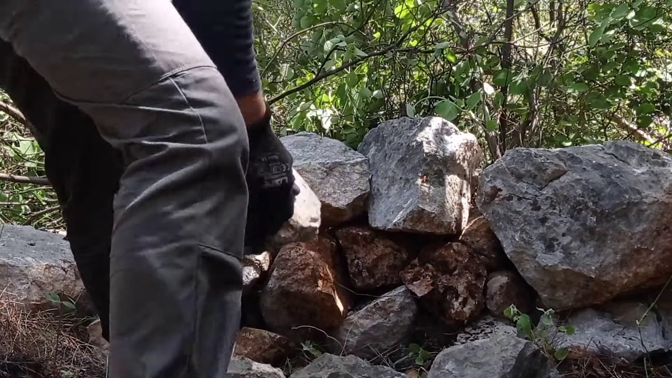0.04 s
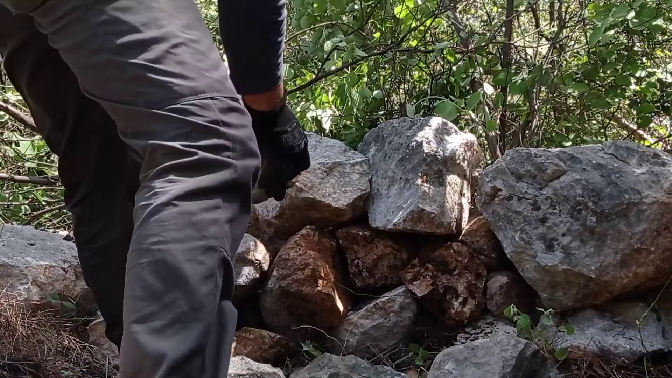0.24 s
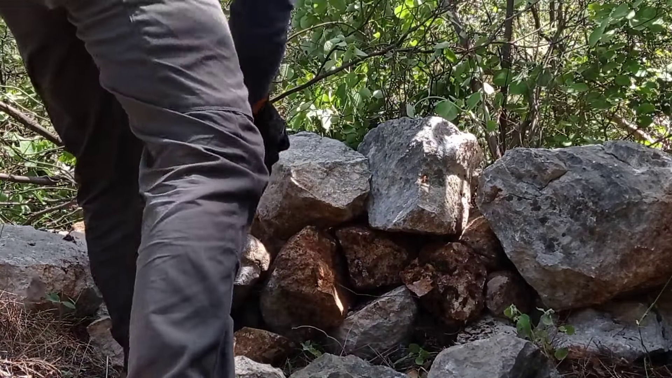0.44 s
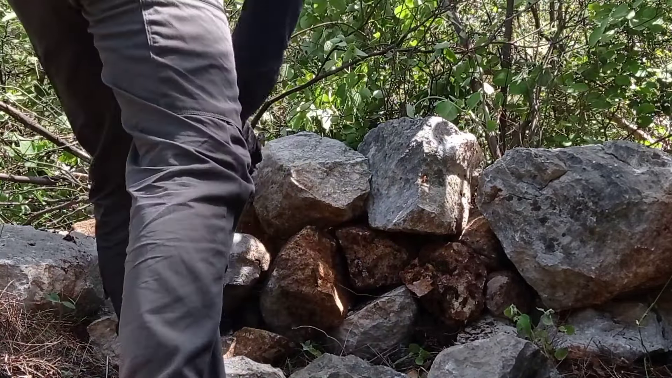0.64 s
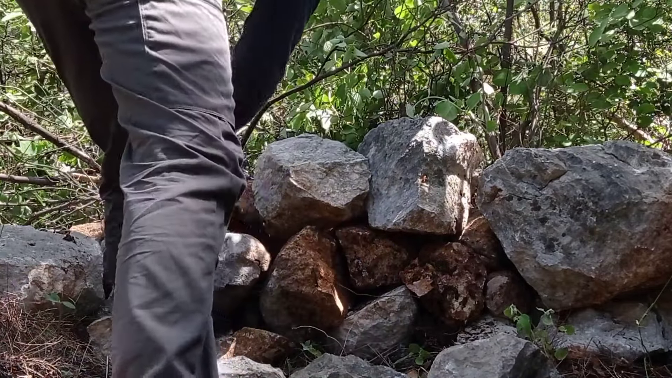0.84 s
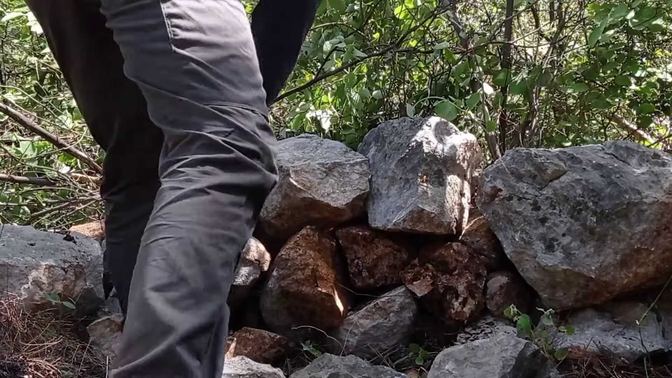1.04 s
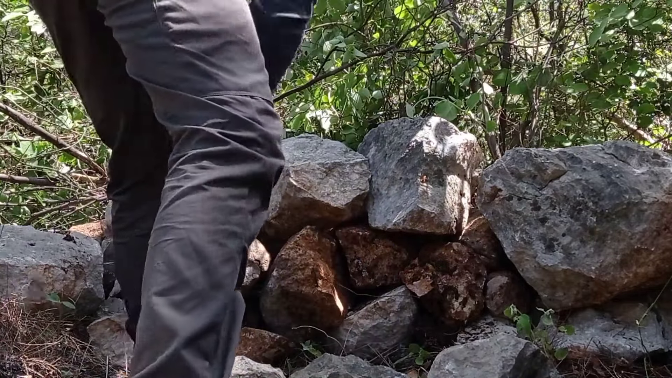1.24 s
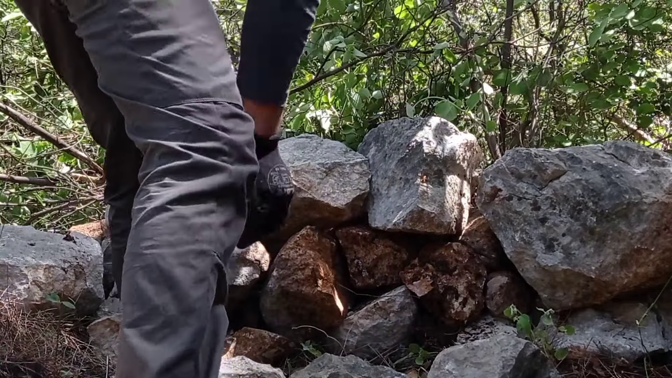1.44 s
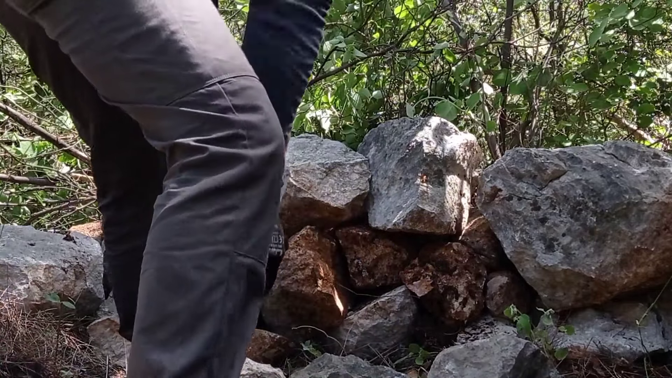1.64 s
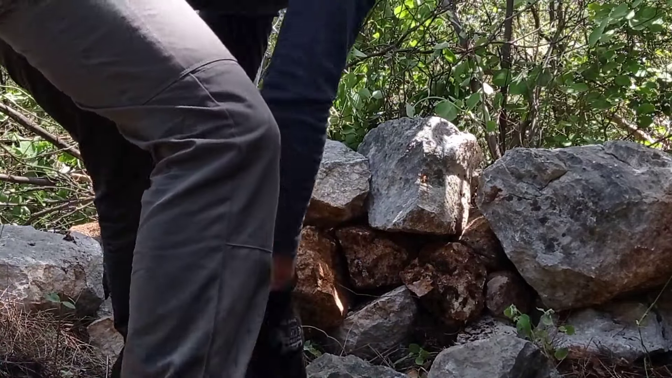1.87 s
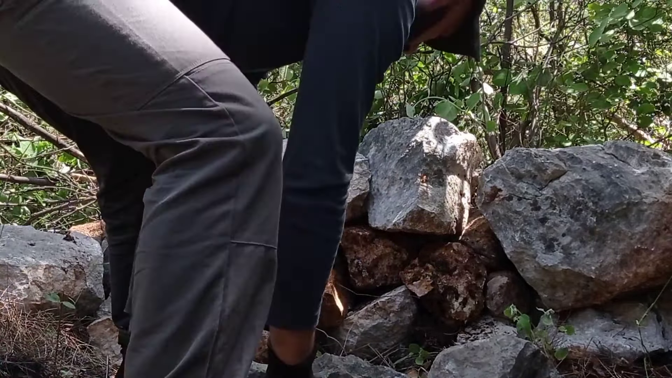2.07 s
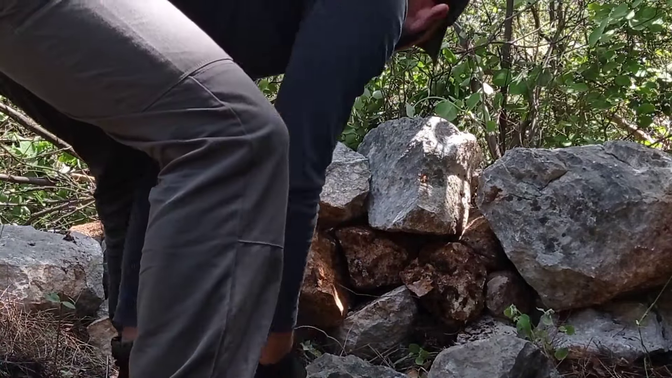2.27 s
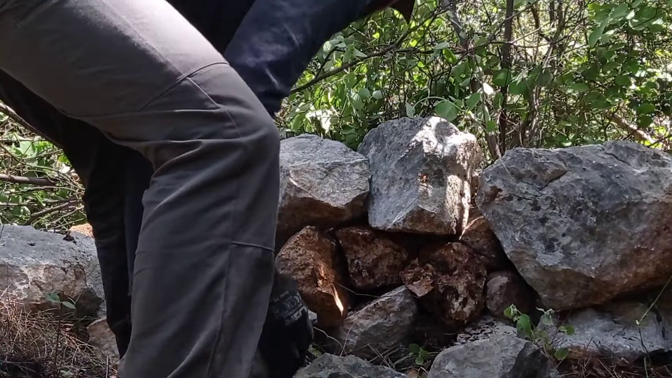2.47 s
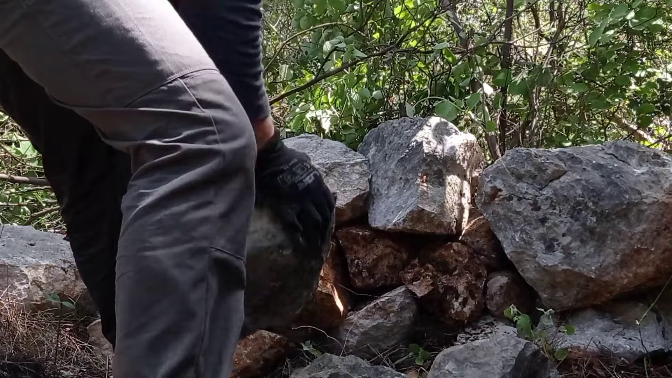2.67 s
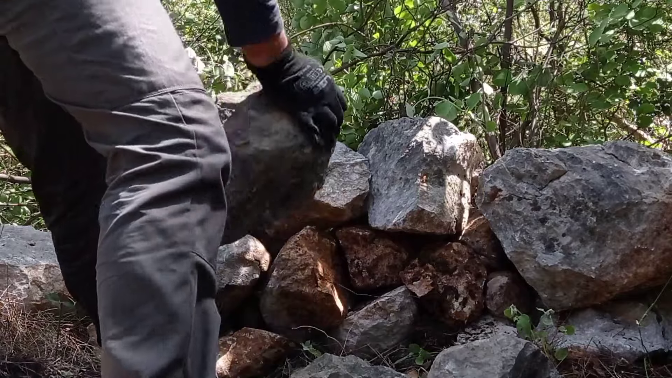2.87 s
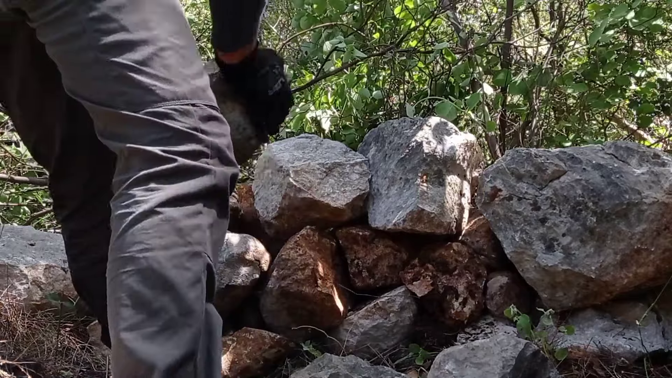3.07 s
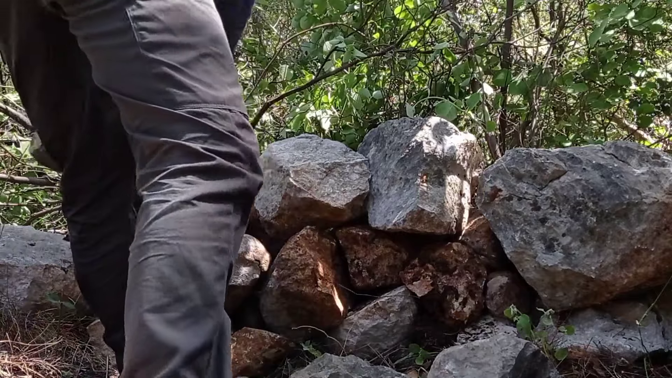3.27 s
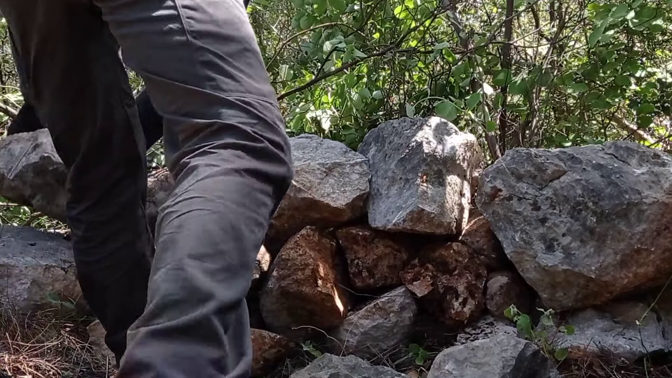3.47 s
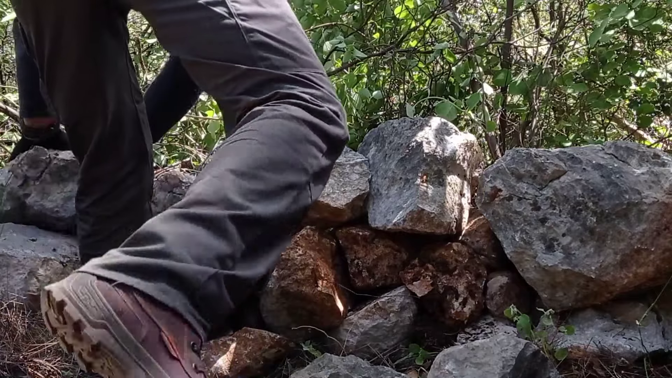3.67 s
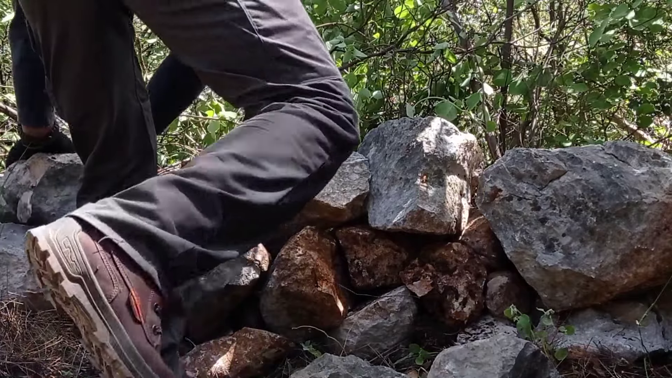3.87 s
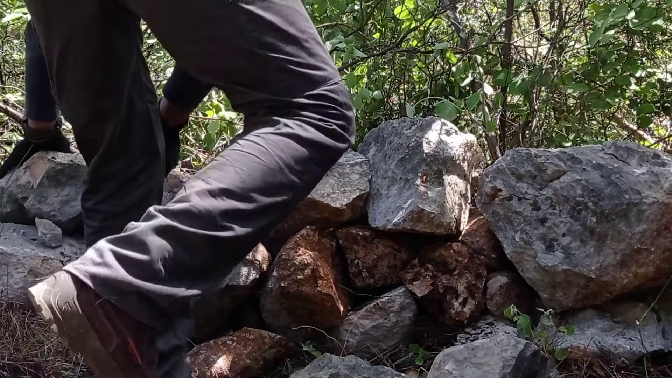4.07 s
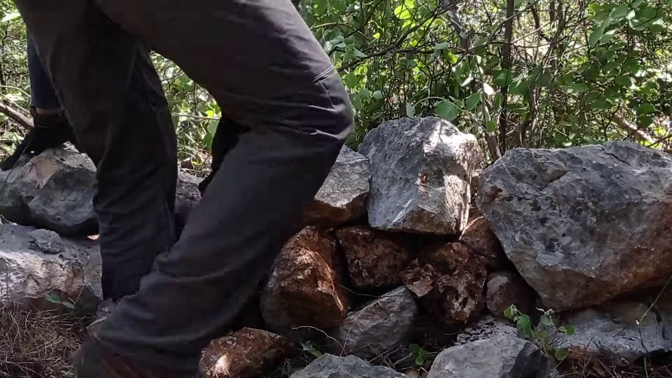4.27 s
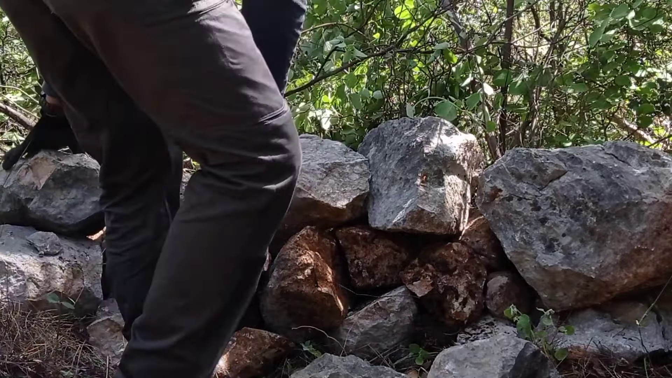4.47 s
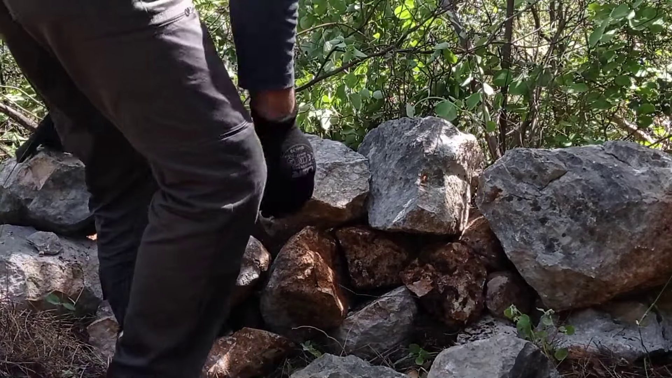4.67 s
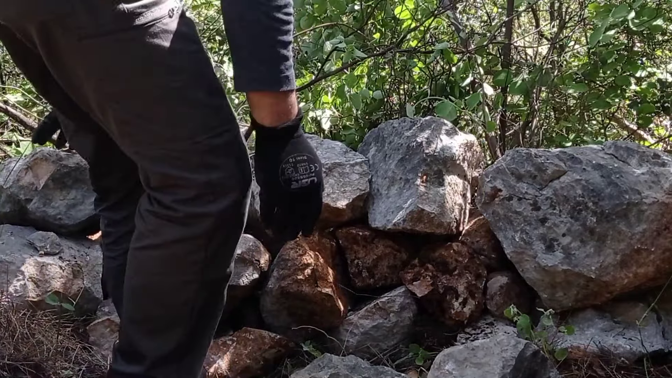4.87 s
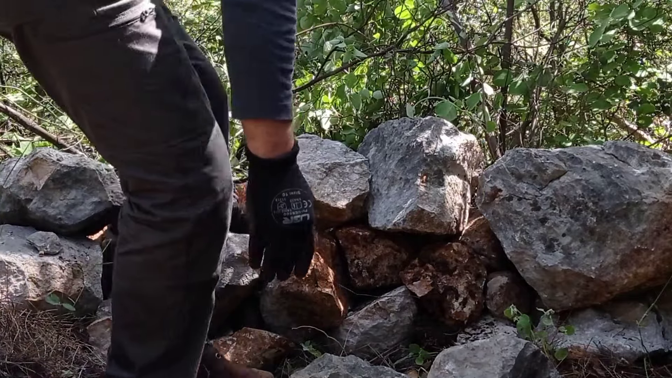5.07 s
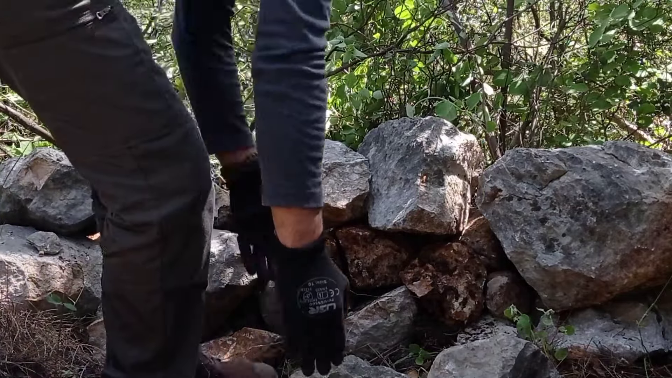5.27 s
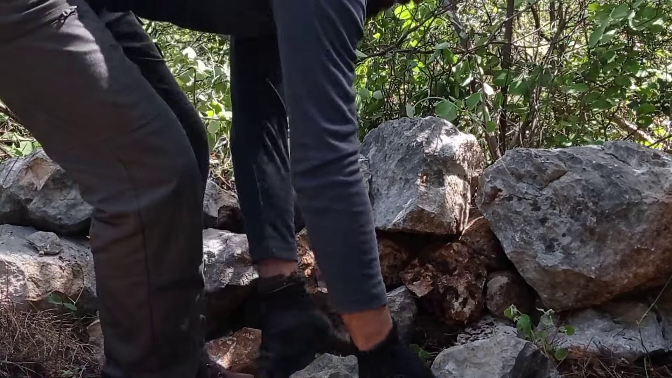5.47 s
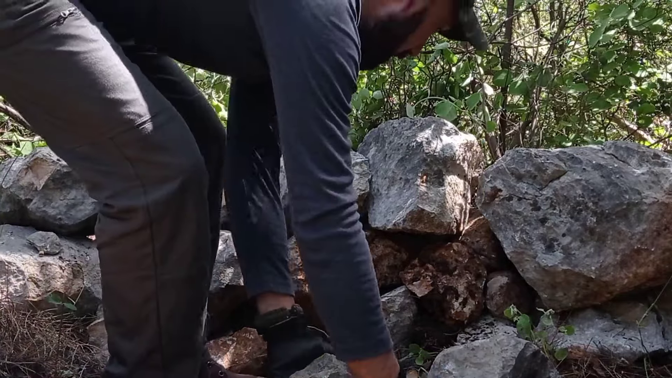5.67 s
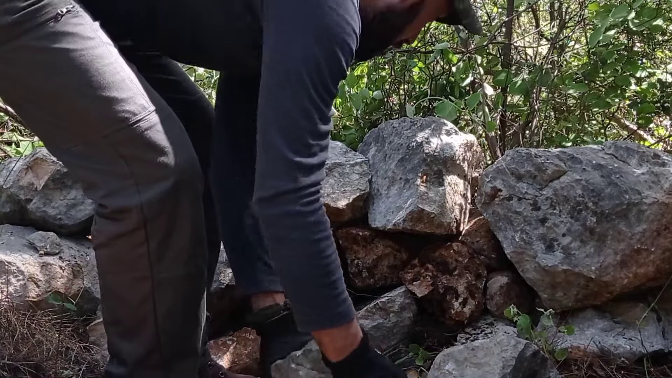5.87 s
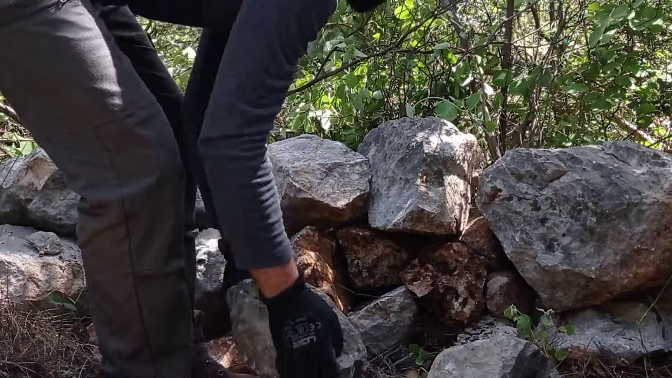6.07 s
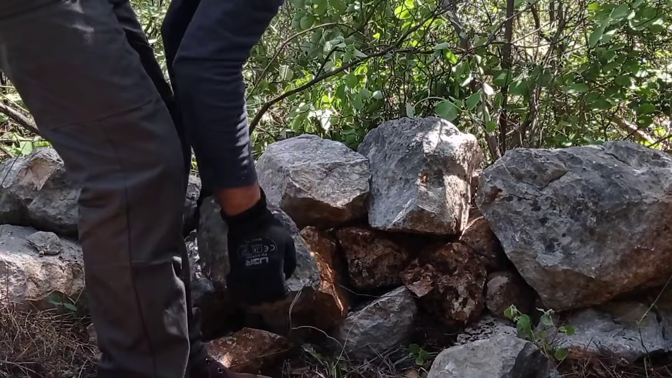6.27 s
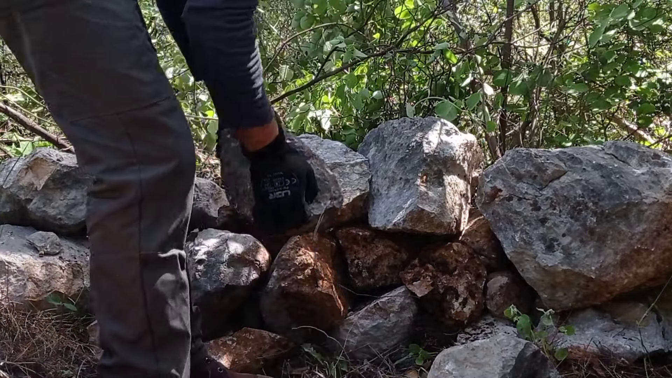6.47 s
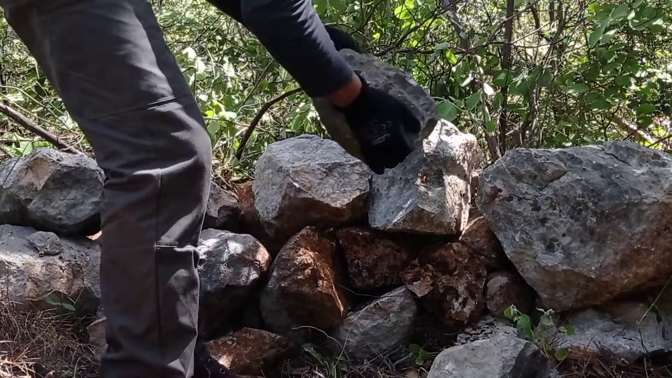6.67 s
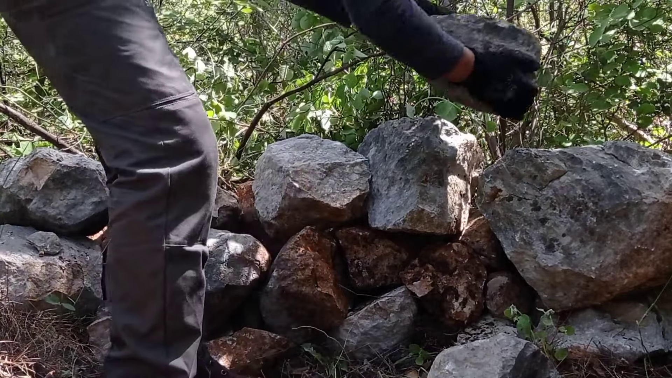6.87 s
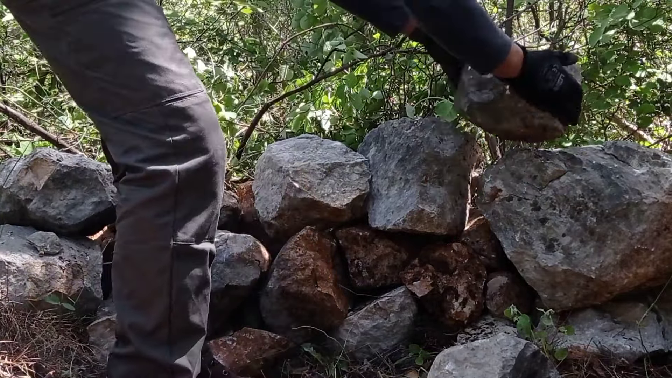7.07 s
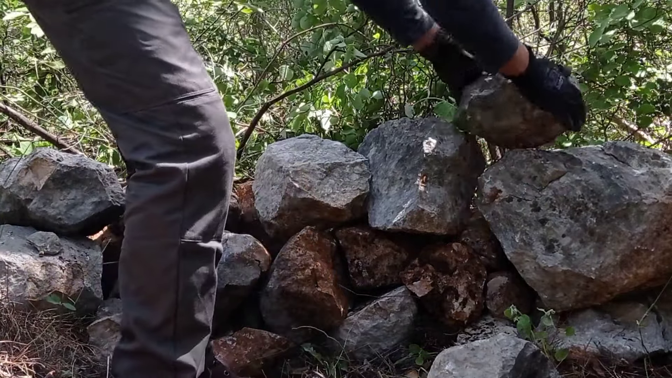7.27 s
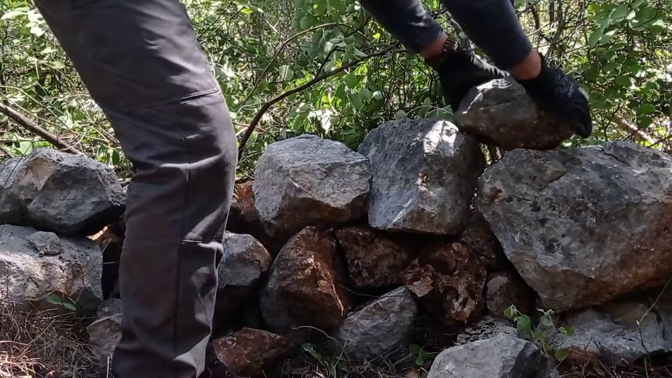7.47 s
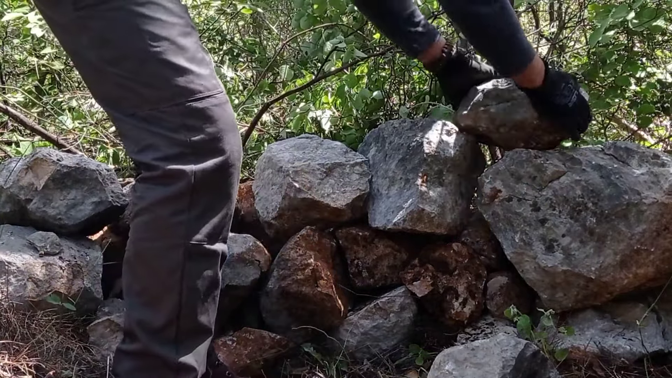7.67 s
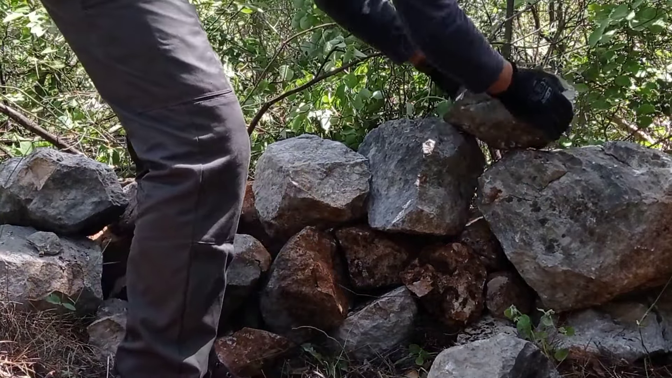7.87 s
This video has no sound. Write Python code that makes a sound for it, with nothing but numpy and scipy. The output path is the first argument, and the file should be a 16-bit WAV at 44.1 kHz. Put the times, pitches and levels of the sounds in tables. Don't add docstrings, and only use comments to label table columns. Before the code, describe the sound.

Outdoors, a microphone a step or two from someone stacking stones. Quiet low rumble, then a sharp double stone clack with small bounces. Dry leaves crunch, boot edges scuff, a distant bird chips and slurs. A second pair of blows follows with tumbling knocks and gritty ticks, then quieter rustling and a brief hollow gust. Finally a rock lands and wobbles until seated.

```python
import sys
import numpy as np
from scipy import signal
from scipy.fft import rfft, irfft, next_fast_len
from scipy.io import wavfile
from scipy.ndimage import uniform_filter1d, map_coordinates

SR = 44100
rng = np.random.default_rng(int(sys.argv[2]) if len(sys.argv) > 2 else 0)


def gain_from_db(level_db):
    decades = np.asarray(level_db, float) / 20
    return 10 ** decades


def log_audio(samples):
    frames = np.atleast_2d(samples).T
    limited = np.clip(frames, -1, 1)
    pcm = np.round(limited * 32767).astype(np.int16)
    wavfile.write(sys.argv[1], SR, pcm)


N = 349624


def unit(x):
    return x / np.sqrt(np.mean(x ** 2) + 1e-20)


def along(points, hz):
    f, value = np.transpose(points)
    return np.interp(np.log(hz + 1), np.log(f + 1), value)


def wobble(rate, size=N):
    coarse = np.arange(0, size + 16, 16)
    knots = rng.standard_normal(int(size * rate / SR) + 5)
    return np.interp(np.arange(size), coarse, map_coordinates(knots, [coarse * rate / SR]))


def swells(rows):
    t = np.arange(0, N + 64, 64) / SR
    rows = np.array(rows)
    late = t - rows[:, :1]
    width = np.where(late < 0, rows[:, 1:2], rows[:, 2:3])
    bell = np.exp(-(late / width) ** 2)
    gains = np.sqrt(gain_from_db(2 * rows[:, 3:]).T @ bell ** 2)
    return [np.interp(np.arange(N) / SR, t, gain) for gain in gains]


def coloured(x, gain_db):
    size = next_fast_len(len(x) + 4096)
    gain = gain_from_db(gain_db(np.fft.rfftfreq(size, 1 / SR)))
    return unit(irfft(rfft(x, size) * gain, size)[:len(x)])


def hump(f, hz, octaves):
    return np.maximum(-6 * (np.log2((f + 1) / hz) / octaves) ** 2, -80)


def rush(spectrum, patchy_db, grain_db):
    grains = rng.standard_normal(N) * gain_from_db(grain_db * wobble(250))
    z = signal.stft(grains, nperseg=512)[2]

    def field(bins, frames):
        noise = uniform_filter1d(rng.standard_normal(z.shape), bins, 0)
        return unit(uniform_filter1d(noise, frames, 1))

    patches = field(8, 12) + field(2, 6)
    x = signal.istft(z * gain_from_db(patchy_db * patches), nperseg=512)[1][:N]
    return coloured(x, lambda hz: along(spectrum, hz))


def add(track, s, sound):
    track[round(s * SR):][:len(sound)] += sound


def burst(gain_db, t60, rise):
    t = np.arange(SR // 8) / SR
    steps = np.repeat(rng.standard_normal(len(t) // 30 + 1), 30)[:len(t)]
    grit = rng.standard_normal(len(t)) * gain_from_db(4 * steps)
    dying = gain_from_db(-60 * t / t60) + gain_from_db(-22 - 60 * t / (3.5 * t60))
    return coloured(grit, gain_db) * dying * (1 - np.exp(-t / rise))


def ring(modes, contact_ms):
    t = np.arange(SR // 8) / SR
    x = np.zeros(len(t))
    for hz, db, t60 in modes:
        rise = (contact_ms + .05) / 1000 * min(1, (1100 / hz) ** 1.5)
        drive = ((1 - np.exp(-t / rise)) * t60 / (t60 + rise)) ** 2
        x += gain_from_db(db - 60 * t / t60) * np.sin(2 * np.pi * hz * t) * drive
    return -x / np.abs(x).max()


# frequency in Hz, level in dB per Hz.
CRACK_SPECTRUM = [(700, -27.5), (1500, 3.5), (3000, -5.5), (4500, -7.5), (6400, -10), (8500, -22.5),
                  (12500, -39), (15400, -29), (16500, -42)]


def crack(t60, rise):
    return burst(lambda hz: along(CRACK_SPECTRUM, hz), t60, rise)


# frequency in Hz, level in dB per Hz.
PILE_SPECTRUM = [(29, -35), (60, -16), (150, 0.5), (307, -2.5), (513, -5), (1070, -9.5), (1210, -7),
                 (1720, -16), (2580, -20), (4000, -25.5), (5200, -56), (8800, -120)]
# frequency in Hz, t60 in seconds.
PILE_DECAY = [(60, .4), (200, 0.16), (700, 0.33), (1500, .2), (4000, 0.13)]


def pile_shake():
    chatter = rng.standard_normal(SR // 2) * gain_from_db(5.5 * wobble(110, size=SR // 2))
    hz, t, z = signal.stft(coloured(chatter, lambda f: along(PILE_SPECTRUM, f)), SR, nperseg=512)
    dying = gain_from_db(-60 * t / along(PILE_DECAY, hz)[:, None])
    tail = signal.istft(z * dying, SR, nperseg=512)[1]
    return tail * (1 - np.exp(-np.arange(len(tail)) / SR / 0.0013))


# start in seconds, peak in dB, contact in ms, crack in dB,
# pile shake in dB.
BLOWS = [
    (0.7419, -10.2, 1.65, -11.5, -28),
    (.809, -4.7, 1.84, -29, -30),
    (3.5309, -10.2, .92, -18, -24),
    (3.5546, -10.7, 1.21, -10, -28),
    (7.1167, -11.1, 3, -16, -39),
]
# mode in Hz, level in dB, t60 in seconds.
ROCKS = [
    [(130, -40, .09), (390, -24, .05), (530, 0, .007), (880, -11, .022), (1100, -16, .016), (1440, -9, .01),
     (1820, -27, .02), (2940, -19, .016), (3950, -19, .012), (4700, -24, .01)],
    [(160, -26, .021), (420, -34, .05), (650, 0, .009), (840, 0, .009), (930, -12, .017), (1230, -13, .011),
     (1560, -16, .005)],
    [(110, -27, .06), (240, -18, .028), (480, -32, .09), (600, -4, .009), (810, 0, .008), (1300, -44, .045),
     (1480, -12, .005), (2240, -39, .039)],
    [(180, -39, .09), (400, -30, .07), (590, -12, .028), (860, 0, .007), (950, -26, .04), (1270, -6, .012),
     (1670, -31, .022), (1950, -17, .005), (6380, -37, .023)],
    [(160, -44, .07), (310, -16, .025), (520, -30, .08), (670, 0, .008), (1040, -14, .015),
     (1490, -1, .005), (1990, -35, .016), (2510, -15, .005)],
]
# delay of the main contact in ms, first contact in dB relative to it.
TOUCHES = [
    (1.27, -15),
    (1.55, -20),
    (1.57, -14.5),
    (1.07, 3),
    (.98, -7),
]


def blows():
    out = np.zeros(N + SR)
    for blow, rock, (late_ms, first_db) in zip(BLOWS, ROCKS, TOUCHES):
        s, db, contact_ms, crack_db, shake_db = blow
        add(out, s, gain_from_db(db + first_db) * ring(rock, .6 * contact_ms))
        add(out, s + late_ms / 1000, gain_from_db(db) * ring(rock, contact_ms))
        add(out, s, gain_from_db(db + crack_db) * crack(t60=.031, rise=.0018))
        add(out, s, gain_from_db(db + shake_db) * pile_shake())
    return out[:N]


# frequency in Hz, level in dB per Hz.
GRUMBLE_SPECTRUM = [(200, -22), (400, -9), (520, 0), (1000, -6), (1900, -24), (5000, -120)]
SETTLE_DB, SETTLE_RISE_S, SETTLE_T60_S = -19.5, .03, .85


def settling():
    s, db, *_, shake_db = np.array(BLOWS).T[:, :, None]
    late = np.maximum(np.arange(N) / SR - s, 0)
    dying = gain_from_db(db + shake_db + SETTLE_DB - 60 * late / SETTLE_T60_S)
    swell = np.sum(dying * (1 - np.exp(-late / SETTLE_RISE_S)), 0)
    grumble = coloured(rng.standard_normal(N), lambda hz: along(GRUMBLE_SPECTRUM, hz))
    return swell * gain_from_db(2.2 * wobble(45)) * grumble


# start in seconds, peak in dB, ring in Hz, crack in dB,
# extra thud in dB.
KNOCKS = [(.7375, -42, 1050, -20, -12), (0.777, -41, 800, -10, -4), (0.8335, -25, 740, -34, -3),
          (0.844, -31, 600, -19.5, -3), (.859, -41, 500, -22, 3), (0.885, -42, 600, -8, -3),
          (.895, -40, 700, -25, -6), (3.586, -27.5, 270, -26, 4), (3.586, -37, 1000, -22, -9),
          (3.604, -39, 900, -30, -6), (3.628, -30, 696, -41, -3), (3.638, -38, 800, -35, -3),
          (3.658, -43, 650, -30, -3), (3.7271, -21.5, 680, -38, 1), (3.742, -41, 450, -30, 3),
          (3.76, -47, 600, -30, 0), (4.4147, -27, 660, -38.5, -8), (4.4205, -40, 1150, -36, -6),
          (4.437, -46.5, 550, -26, 0), (4.474, -53, 525, -20, 0), (5.873, -47, 557, -34, -3)]
# start in seconds, peak in dB, ring in Hz, crack in dB,
# extra thud in dB.
SEATING = [(7.144, -31, 420, -21.5, 0), (7.145, -36, 900, -25, -9), (7.157, -45, 480, -25, 0),
           (7.167, -45, 400, -25, 0), (7.198, -47, 620, -14, -8), (7.219, -54, 600, -20, -3),
           (7.3868, -25.5, 800, -54, -4), (7.391, -33, 600, -50, -3), (7.3995, -36, 616, -38, -4),
           (7.429, -43, 588, -30, 0), (7.449, -44, 558, -31, 0), (7.469, -56, 405, -17, 0),
           (7.789, -47, 685, -34.5, 0), (7.815, -58, 600, -34, 0), (7.832, -48, 750, -40, 3),
           (7.844, -57, 620, -25, 0), (7.858, -53, 600, -30, 0), (7.87, -47, 800, -28, 0),
           (7.8775, -40, 740, -34, 0), (7.9025, -38, 1065, -20, 0), (7.9055, -34, 1000, -21, 0),
           (7.909, -32, 520, -30, 7), (7.917, -41, 560, -30, -4), (7.837, -51, 330, -40, 0),
           (7.803, -55, 700, -34, -3)]


def knocks():
    out = np.zeros(N + SR)
    for s, db, hz, crack_db, extra_db in KNOCKS + SEATING:
        soft_db = -35 - db
        t60 = .025 + .0006 * soft_db
        thud_db = -10.5 + .45 * soft_db
        hard_db = -0.24 * soft_db
        shift = rng.normal(0, 0.068, 3)
        rock = [(hz, 0, .9 * t60),
                (hz * (.62 + shift[0]), -8, 1.1 * t60),
                (hz * (1.45 + shift[1]), -10, .75 * t60),
                (hz * (2.2 + shift[2]), -21 + hard_db, .5 * t60),
                (hz * 3.3, -29 + hard_db, .5 * t60)]
        thud = ring([(127.7, 0, .07), (255, 1.1, .045)], contact_ms=1.7)
        add(out, s, gain_from_db(db + 3) * ring(rock, contact_ms=.85))
        add(out, s + .0008, gain_from_db(db + thud_db + extra_db + 4.5) * thud)
        add(out, s + .00062, gain_from_db(db + crack_db) * crack(t60=.042, rise=.0005))
        add(out, s, gain_from_db(db - 25) * pile_shake())
    return out[:N]


# start in seconds, peak in dB, centre in Hz, air in dB.
GRIT = [(1.3495, -59.5, 1770, -11), (1.4274, -63, 1760, -27), (2.2927, -59, 2260, -38),
        (3.1608, -65, 1655, -33), (3.6173, -38, 1845, -60), (3.93, -34, 1870, -30.5),
        (3.9586, -51, 1960, -55), (4.001, -56, 1800, -36), (4.0095, -42, 2400, -55),
        (4.029, -42, 1670, -60), (4.1285, -50, 1760, -27.5), (4.2756, -60, 2600, -26),
        (5.7635, -56, 2500, -44.5), (5.8718, -48.5, 4370, -17), (6.3792, -55.5, 3200, -13),
        (7.199, -62, 2500, -30), (7.43, -60, 3500, -30), (7.6365, -43, 4200, -26)]
# start in seconds,
# peak in dB, centre in Hz, air in dB.
TWIGS = [(.738, -44, 6500, -30), (3.727, -44, 7000, -30), (1.7442, -61.5, 6520, -25.5),
         (2.031, -58, 4180, -40), (2.066, -56, 4710, -44), (2.1155, -43, 4800, -40),
         (5.709, -58, 4500, -40), (5.7305, -56, 3300, -40), (2.5511, -58.5, 5420, -44),
         (3.2455, -59, 6510, -36), (3.6805, -48, 7000, -40), (3.6935, -48, 6580, -35),
         (3.8147, -51, 6200, -38), (3.9295, -43, 6030, -25.5), (3.936, -41, 7800, -37),
         (3.939, -38, 6000, -37), (4.0095, -46, 6200, -40), (4.0295, -45, 6800, -40),
         (4.0354, -40, 3700, -53), (4.1285, -57, 6000, -25), (4.377, -58, 5680, -34),
         (4.6339, -60, 6520, -18), (5.0012, -49, 5940, -15), (5.253, -45, 6000, -30),
         (5.2979, -35.5, 6500, -8), (6.0033, -44.5, 3800, -53.5), (6.5014, -58, 5740, -38),
         (6.554, -58, 6300, -30), (6.585, -60, 4500, -30), (6.7057, -53.5, 7200, -37.5),
         (7.7687, -60, 6460, -44), (7.8628, -57, 6520, -37.5)]
# frequency in Hz, gain in dB.
CAPSULE = [(7500, 0), (9500, -4), (12500, -13), (16000, -29)]
GRIT_OCTAVES, GRIT_T60_S = .8, .037
TWIG_OCTAVES, TWIG_T60_S = .48, .028


def ticks():
    out = np.zeros(N + SR)
    for rows, octaves, t60 in ((GRIT, GRIT_OCTAVES, GRIT_T60_S), (TWIGS, TWIG_OCTAVES, TWIG_T60_S)):
        for s, db, hz, air_db in rows:
            snap = burst(lambda f: hump(f, hz, octaves) + along(CAPSULE, f), t60, rise=.0002)
            air = burst(lambda f: -9 * np.abs(f - 15400) / 1000, .8 * t60, rise=.0005)
            add(out, s, gain_from_db(db - 6.5) * snap)
            add(out, s, gain_from_db(db + air_db + 1) * air)
    return out[:N]


# peak in seconds, rise in seconds, fall in seconds,
# coarse crunch in dB, fine hiss in dB.
STROKES = [(.735, 0.025, 0.045, -62, -70), (.79, 0.033, 0.064, -62, -62), (.87, .04, .045, -63.5, -67.5),
           (1.73, 0.031, 0.022, -68.5, -67.5), (2.02, 0.025, 0.068, -67, -88),
           (2.12, .06, 0.096, -65, -73.5), (2.32, .02, 0.044, -73.5, -90), (2.56, .02, 0.033, -75, -88),
           (3.46, .04, .03, -70, -68), (3.6, 0.063, 0.07, -59, -62.5), (3.74, 0.12, 0.038, -66, -75),
           (4.17, 0.05, 0.06, -74, -72.5), (4.66, 0.057, 0.054, -73, -70), (5.29, 0.033, .05, -64.5, -65.5),
           (5.87, 0.09, 0.055, -75, -78.5), (7.08, 0.069, 0.079, -64.5, -71),
           (7.21, 0.027, 0.04, -73, -82.5)]
# peak in seconds, half length in seconds, hiss in dB.
BRUSHES = [(1.37, .025, -87.5), (1.45, .022, -80), (2.67, .03, -81), (2.81, .04, -84), (2.93, .05, -77),
           (4.3, .03, -75), (4.47, .09, -71), (4.84, .07, -80), (5.02, .06, -75), (5.45, .06, -78.5),
           (6.0, .05, -85.5), (6.58, .1, -76), (6.72, .037, -74.5), (6.92, .06, -82), (7.33, .042, -77),
           (7.45, .02, -75.5), (7.89, .016, -71)]
# coarse level in dB, fine level in dB.
LEAVES_DB = (-86.5, -85.5)
# frequency in Hz, level in dB per Hz.
CRUNCH_SPECTRUM = [(530, -34), (900, -5), (1100, -15.5), (1340, -8), (1710, -3.5), (6000, -3.5),
                   (7800, -31.5), (13200, -120)]
# frequency in Hz, level in dB per Hz.
HISS_SPECTRUM = [(1760, -34.5), (3000, -12.5), (4340, -10.5), (5070, -9.5), (5560, -3), (6580, 3.5),
                 (12500, -22.5), (13600, -24.5), (15200, -11), (16000, -17.5), (16300, -29.5)]


def litter():
    brushes = [(s, half, half, db - 4, db) for s, half, db in BRUSHES]
    coarse, fine = swells(STROKES + brushes)
    stir = gain_from_db(2.5 * wobble(40))
    coarse_gain = coarse * stir + gain_from_db(LEAVES_DB[0] + 1.5 * wobble(1.7))
    fine_gain = fine * stir + gain_from_db(LEAVES_DB[1] + 1.2 * wobble(4))
    crunch = coarse_gain * rush(CRUNCH_SPECTRUM, patchy_db=2.0, grain_db=2.5)
    hiss = fine_gain * rush(HISS_SPECTRUM, patchy_db=2.5, grain_db=2.5)
    return crunch + hiss


# peak in seconds, rise in seconds, fall in seconds,
# level in dB, centre in Hz.
SCUFFS = [(2.03, .025, .006, -62, 3800), (2.03, .012, .03, -72, 2100), (2.076, .018, .006, -60, 4400),
          (2.119, .006, .008, -56, 4300), (2.202, .01, .01, -63, 3800), (6.68, .025, .025, -79, 1900),
          (7.03, .025, .06, -69, 4200), (4.08, .04, .03, -76, 5500), (5.42, .012, .01, -70, 8300),
          (2.09, .06, .07, -68, 650), (2.2, .03, .03, -72, 600), (7.459, .004, .014, -63, 4600),
          (7.46, .005, .02, -68, 1400), (2.9, .015, .02, -76, 2300), (3.04, .02, .02, -77, 2600),
          (5.3, .03, .04, -68, 520), (3.47, .015, .015, -72, 2500), (7.82, .03, .05, -63, 800)]


def scuffs():
    out = np.zeros(N + SR)
    t = np.arange(-SR // 8, SR // 8) / SR
    for s, rise, fall, db, hz in SCUFFS:
        grit = rng.standard_normal(len(t)) * gain_from_db(3 * wobble(400, size=len(t)))
        swell = np.exp(-(t / np.where(t < 0, rise, fall)) ** 2)
        add(out, s + t[0], gain_from_db(db) * coloured(grit, lambda f: hump(f, hz, octaves=.35)) * swell)
    return out[:N]


# time after the note's start in seconds, pitch in Hz, level in dB.
PHRASE = [
    [(0, 4500, -10), (.014, 4800, -1), (.032, 5000, 0), (.042, 5200, -10)],
    [(0, 6150, -9), (.025, 6000, -2), (.06, 5750, -2), (.085, 5450, -2), (.105, 4500, -5), (.122, 3780, -3),
     (.132, 3780, -2), (.155, 4350, -3), (.163, 4400, -10)],
]
# start of chip in seconds, start of slur in seconds.
REPEATS = [
    (1.875, 2.06),
    (2.313, 2.465),
    (2.735, 2.925),
]
# chip in dB, slur in dB.
REPEAT_DB = [
    (-87, -77),
    (-75.5, -75.5),
    (-77, -82),
]
# start in seconds, length in seconds, pitch in Hz, level in dB.
FAR_CALLS = [
    (1.77, .21, 1920, -94),
    (5.3, .15, 1920, -91),
]
ECHO_DB, ECHO_T60_S = 2, .7
LEAF_FLUTTER_HZ = 220


def bird():
    out = np.zeros(N)
    notes = []
    for starts, levels in zip(REPEATS, REPEAT_DB):
        for note, s, db in zip(PHRASE, starts, levels):
            notes.append(np.array(note) + [s, 0, db])
    for s, length, hz, db in FAR_CALLS:
        notes.append(np.array([(s, hz, db), (s + length, hz, db - 6)]))
    for note in notes:
        s, hz, db = note.T
        t = np.arange(s[0], s[-1], 1 / SR)
        flutter_db = 2 * wobble(50, size=len(t))
        waver = 1 + .009 * wobble(120, size=len(t))
        edge = np.clip(np.minimum(t - s[0], s[-1] - t) / .005, 0, 1)
        phase = 2 * np.pi * np.cumsum(np.interp(t, s, hz) * waver) / SR
        add(out, s[0], edge * gain_from_db(np.interp(t, s, db) + 8 + flutter_db) * np.sin(phase))
    t = np.arange(SR // 3) / SR
    trees = rng.standard_normal(len(t)) * gain_from_db(-60 * t / ECHO_T60_S)
    echo = signal.fftconvolve(out, trees / np.linalg.norm(trees))[:N]
    return out + gain_from_db(ECHO_DB) * echo * (.6 + .8 * unit(wobble(LEAF_FLUTTER_HZ)))


# time in seconds, level in dB.
RUMBLE_LEVEL = [(0.0, -65), (0.7, -68), (1.3, -67), (2.25, -72), (2.38, -61), (2.89, -64), (3.2, -61),
                (3.49, -69), (3.95, -64), (4.2, -61), (4.6, -63.5), (5.2, -67), (5.55, -60), (5.8, -65),
                (6.23, -72), (6.8, -70), (7.5, -70), (7.93, -63)]
# peak in seconds, rise in seconds, fall in seconds, level in dB.
FOOTFALLS = [
    (7.475, .03, .03, -57),
    (3.73, .05, .05, -48),
    (7.15, .05, .05, -59),
]
# peak in seconds, rise in seconds, fall in seconds, level in dB.
HOLLOW = [(.13, .1, .1, -66), (2.1, 0.23, 0.24, -74.5), (3.45, .08, 0.24, -69.5), (4.1, 0.18, 0.31, -69.5),
          (4.85, .2, .2, -70), (5.22, 0.072, 0.059, -62.5), (5.33, 0.053, 0.052, -55),
          (5.44, 0.044, 0.12, -59.5), (6.55, 0.12, 0.084, -70.5)]
# frequency in Hz, level in dB per Hz.
RUMBLE_SPECTRUM = [(15, -10), (30, -9), (59, -1.5), (113, 0), (184, -8.5), (260, -23.5), (340, -47.5),
                   (570, -120)]
# frequency in Hz, level in dB per Hz.
DRONE_SPECTRUM = [(88, -31), (150, -12), (286, -7.5), (407, -7), (506, -4), (729, -9), (792, -11),
                  (1800, -27), (2340, -43.5), (3960, -120)]


def ground():
    s, db = np.transpose(RUMBLE_LEVEL)
    rumble_db = np.interp(np.arange(N) / SR, s, db)
    rumble_gain = (gain_from_db(rumble_db) + swells(FOOTFALLS)[0]) * gain_from_db(2.5 * wobble(22))
    rumble = rumble_gain * rush(RUMBLE_SPECTRUM, patchy_db=-1.0, grain_db=2)
    hollow = [(150, -44), (230, -10), (310, 1), (400, -13), (600, -51)]  # Hz, dB per Hz
    boom = swells(HOLLOW)[0] * rush(hollow, patchy_db=1.0, grain_db=1)
    drone_db = -74 + .3 * (rumble_db - rumble_db.mean())
    drone_gain = gain_from_db(drone_db) * gain_from_db(1.5 * wobble(30))
    drone = drone_gain * rush(DRONE_SPECTRUM, patchy_db=0.5, grain_db=0.43)
    return rumble + boom + drone


def scene():
    stones = blows() + settling() + knocks()
    person = ticks() + litter() + scuffs()
    return (stones + person + bird() + ground())[None]


def roll_off(x):
    return signal.sosfilt(signal.butter(12, 16520, fs=SR, output="sos"), x)


def record(dry):
    low_cut = signal.butter(4, 68, "high", fs=SR, output="sos")
    below_top = np.fft.rfftfreq(N, 1 / SR) < 16300
    kept = irfft(rfft(signal.sosfilt(low_cut, dry)) * below_top, N)
    rounded = kept / (1 + np.abs(kept / .7) ** 4) ** .25
    return roll_off(rounded)


dry = scene()
out = record(dry)
log_audio(out)
```